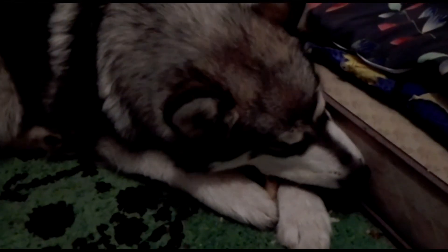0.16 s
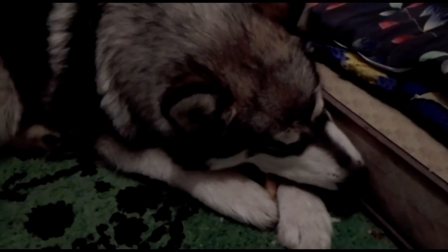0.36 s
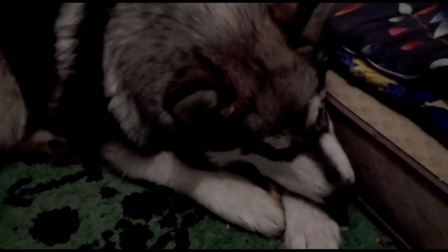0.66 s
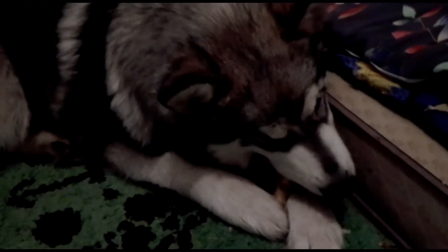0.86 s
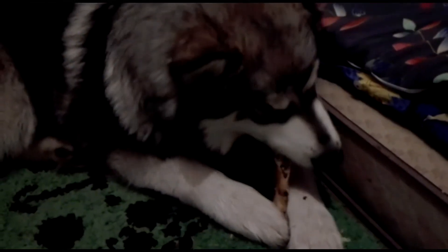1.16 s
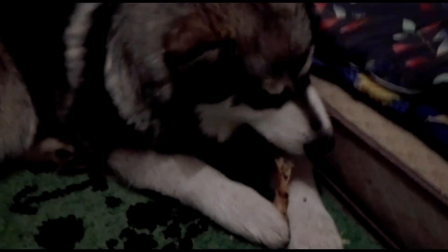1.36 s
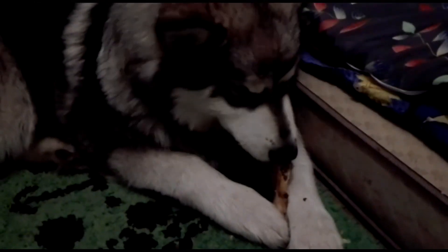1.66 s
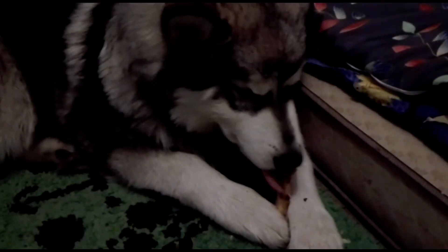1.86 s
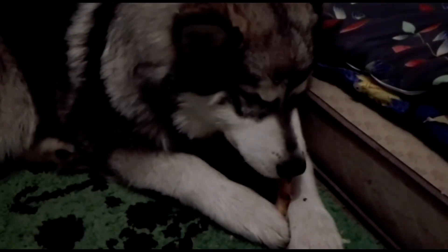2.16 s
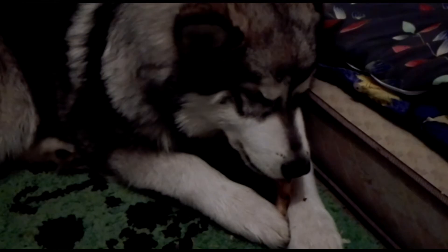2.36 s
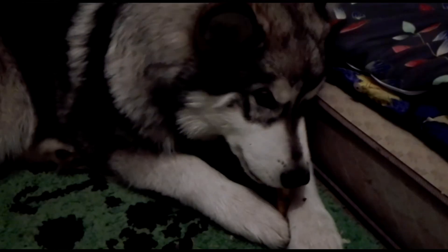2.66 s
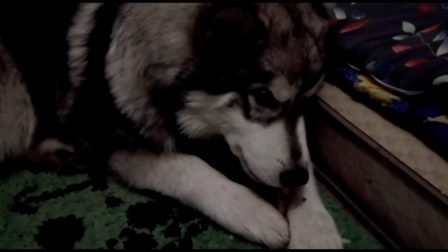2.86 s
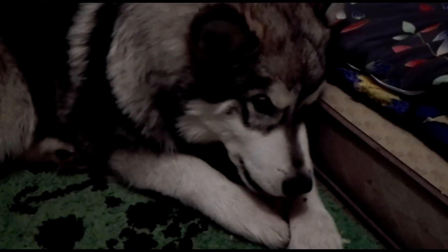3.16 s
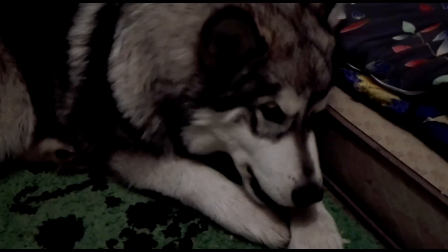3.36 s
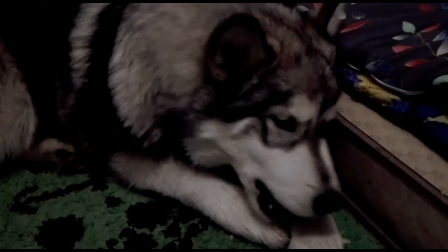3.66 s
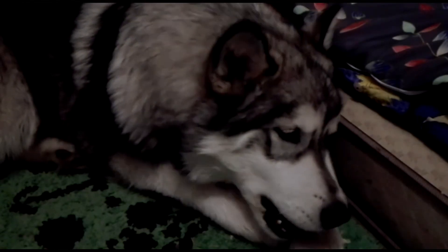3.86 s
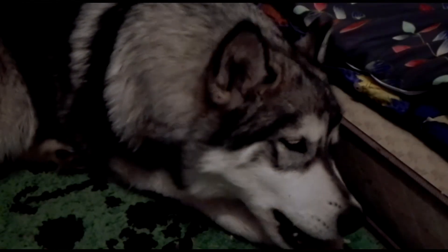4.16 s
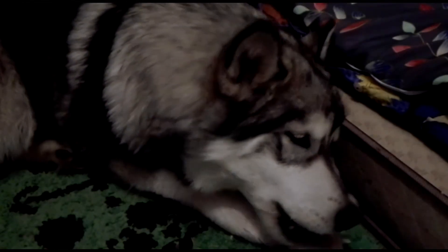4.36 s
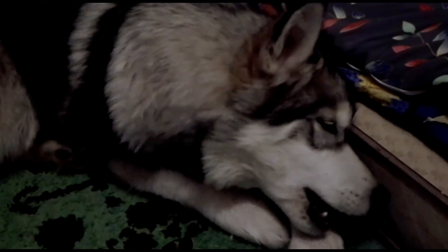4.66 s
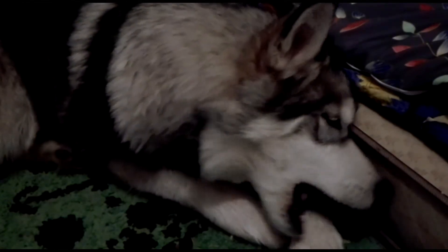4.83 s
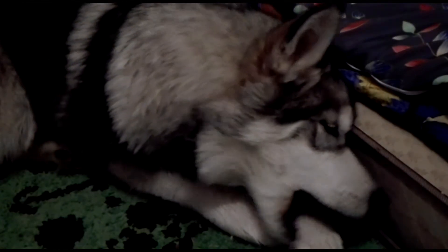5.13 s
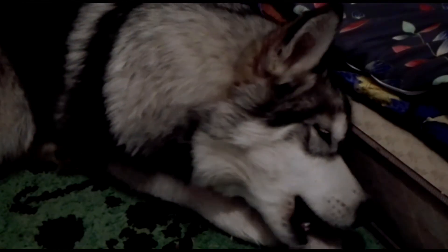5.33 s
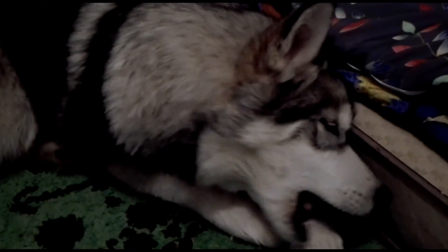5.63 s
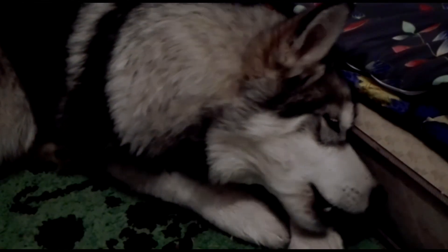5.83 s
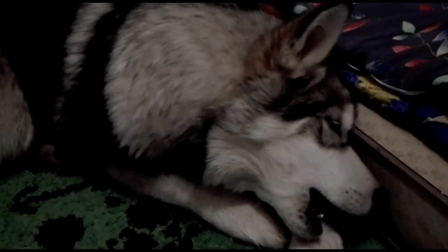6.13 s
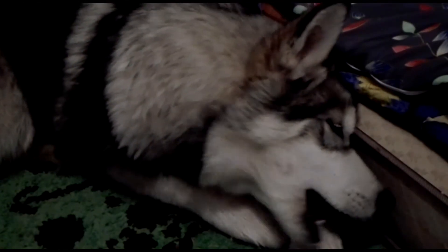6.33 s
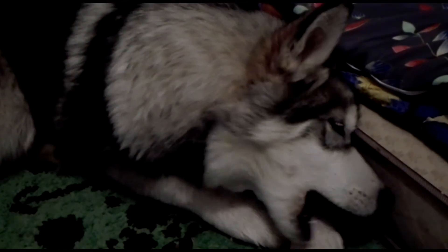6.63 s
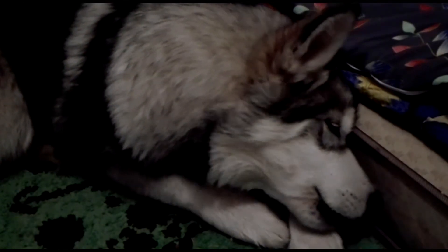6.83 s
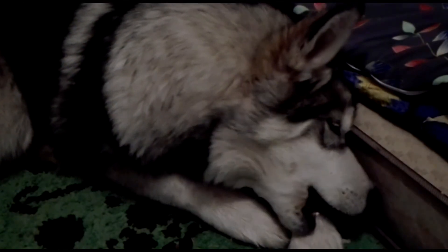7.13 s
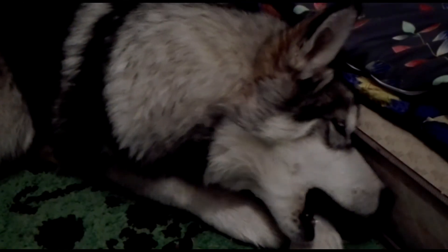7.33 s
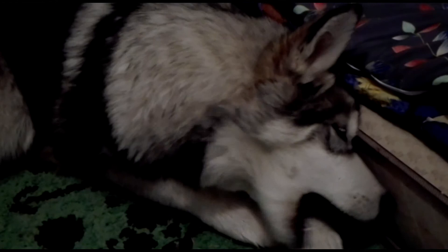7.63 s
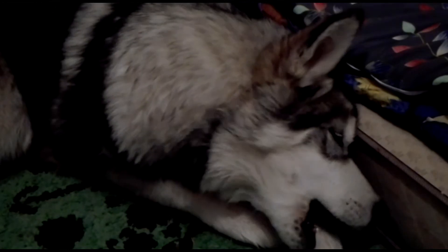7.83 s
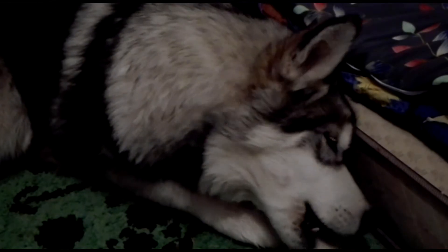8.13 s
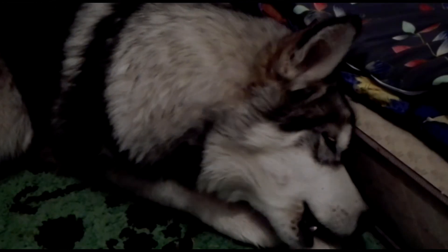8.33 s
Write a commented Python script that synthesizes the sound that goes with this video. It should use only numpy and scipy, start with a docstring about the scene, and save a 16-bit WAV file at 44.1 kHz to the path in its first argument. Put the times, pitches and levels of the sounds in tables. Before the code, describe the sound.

Small dry ticks and clicks of teeth on bone, a crisp crunch midway, and finally a violent cluster of cracks near the end.

```python
"""Dog gnawing a bone

Furnished room, quiet; a large dog on a rug, a metre from a small camera's microphone.
Cracks and faint ticks ring mouth, bone, teeth and jaw with a noisy splinter; thuds ring floor boards.
Random clicks, filtered, make shuffles, licks and a tooth's scrape; narrow noise makes a faint tone.
Floor echo and short room tail answer, over shaped-noise hiss, a wavering hum and a slow rumble."""
import sys
import numpy as np
from scipy import signal
from scipy.fft import rfft, irfft
from scipy.io import wavfile
from scipy.ndimage import uniform_filter1d

SR = 44100
rng = np.random.default_rng(int(sys.argv[2]) if len(sys.argv) > 2 else 0)


def int16_out(signal):
    """Quantize to a 16-bit WAV file."""
    q = np.round(np.clip(np.atleast_2d(signal).T, -1, 1) * 32767)
    wavfile.write(sys.argv[1], SR, q.astype(np.int16))


N = 374409

# microphone hiss, spectrum shape: f/Hz, relative level per Hz/dB
HISS_SHAPE = [(21, -23), (35, -9.5), (44, -14), (95, -21.5), (408, -33), (566, -36.5), (1090, -32.5),
              (1390, -32.5), (1500, -32.5), (1660, -34.5), (14000, -39)]
# rumble, level of its deep part: t/s, level/dB
RUMBLE_LEVEL = [(0.0, -59.5), (1.23, -65.5), (1.32, -51.5), (1.82, -85), (2.01, -61), (2.58, -71),
                (2.67, -48), (2.95, -74), (3.47, -55), (3.62, -77), (4.35, -56.5), (5.32, -72), (5.53, -45),
                (5.72, -75), (5.84, -49), (6.0, -66), (8.44, -59.5), (8.49, -79)]
# bites: t/s, f where the bite rings most/Hz, bone level/dB, tooth level/dB, mouth level/dB, splinter level/dB
BITES = [(0.077, 4770, -77, -60.5, -76, -56), (0.5048, 6340, -71, -64, -67.5, -64),
         (0.7562, 3900, -77, -55, -66, -56), (1.2582, 3460, -79, -73, -64, -74),
         (1.613, 1560, -61, -63, -62, -73), (1.993, 5170, -66, -57.5, -62, -53),
         (2.0666, 4750, -67, -58.5, -50, -52.5), (2.0922, 4650, -77, -63, -53, -59),
         (2.1168, 1640, -56, -51.5, -44.5, -65), (2.1206, 1590, -54, -56, -66, -61),
         (2.1272, 4830, -61, -50.5, -47, -60), (2.4827, 5520, -67.5, -46, -59.5, -62),
         (2.664, 4540, -69, -62, -82, -75), (3.239, 1560, -61, -56.5, -64, -64),
         (3.2969, 2140, -70, -73, -62.5, -72), (3.671, 4550, -78, -79, -71, -77),
         (3.7926, 5000, -62.5, -56.5, -81, -56), (3.826, 1430, -55, -53, -48.5, -75),
         (3.8641, 1420, -62, -63, -70, -66), (4.2321, 2380, -62.5, -61, -59, -72),
         (4.3181, 4970, -58, -60, -64.5, -46.5), (4.3484, 1730, -63, -67, -79, -68),
         (4.8874, 4660, -66, -59, -65.5, -51.5), (4.9676, 2090, -57, -59, -53, -64),
         (4.9713, 4400, -47, -43.5, -56, -70), (5.229, 2280, -49, -50, -60, -56),
         (5.3108, 2220, -39.5, -75, -38.5, -71), (5.3232, 5040, -52, -40, -51, -42),
         (5.3335, 1650, -42.5, -58, -40, -63), (5.342, 5700, -42, -37, -54, -44),
         (5.3682, 1740, -31.5, -42, -42, -52), (5.3699, 5650, -33, -30, -42, -33),
         (5.3743, 6220, -33, -32, -53, -49), (5.403, 4620, -45, -44, -52, -39),
         (5.4082, 3150, -47, -49, -46, -32), (5.433, 4700, -42, -37, -61, -47),
         (5.4373, 5220, -51, -49, -52, -49), (6.0422, 1640, -58, -50.5, -60, -72),
         (6.0454, 2060, -43, -51, -47.5, -59), (6.279, 1930, -50.5, -47, -58.5, -55),
         (6.3511, 2080, -35.5, -47.5, -55, -61), (6.3904, 3500, -67, -59, -64, -71),
         (6.541, 1950, -79, -74, -53.5, -73), (7.0617, 4740, -66, -63, -61, -62),
         (7.1394, 4600, -58, -51, -56, -80), (7.3232, 4900, -67, -51.5, -73, -58),
         (7.3662, 4630, -55.5, -54.5, -63.5, -75), (7.4148, 2210, -41.5, -40, -65, -73),
         (7.4167, 4800, -39.5, -47, -54, -68), (7.4284, 4520, -34, -34, -40, -73),
         (7.5997, 1890, -61.5, -71, -67, -72), (7.621, 1900, -63, -68, -67, -69),
         (7.6854, 2150, -53, -67, -63, -68), (7.6948, 2240, -45, -60, -45.5, -57),
         (7.7778, 5200, -60, -60, -65, -53), (7.7894, 5400, -58, -46, -46.5, -35),
         (7.7925, 5210, -38.5, -28.5, -67, -32), (7.7982, 2180, -39, -40, -49, -27.5),
         (7.8096, 2640, -25.5, -31, -35, -43), (7.8649, 5100, -45, -31, -36, -41),
         (7.8674, 2260, -28, -45, -31, -27), (7.905, 2930, -12.5, -8.5, -22.5, -19),
         (7.9158, 5300, -24, -14.5, -37, -16), (7.9393, 3400, -24, -6, -22, -21),
         (7.9698, 3160, -24, -7, -42, -27), (7.9716, 6250, -39, -5.5, -34, -16),
         (7.984, 4970, -22, -19, -42, -34), (7.9991, 3970, -5.5, -4, -45, -13),
         (8.0039, 3597, -12.5, 2.5, -17, -10), (8.2946, 2550, -51.5, -63.5, -58.5, -79.5),
         (8.3438, 4760, -54, -50.5, -51, -59.5), (8.3561, 2670, -41, -42.5, -53.5, -60),
         (8.4007, 4930, -65, -51, -79, -61.5)]
# hollow of the mouth, before a random detune: t/s, f/Hz
MOUTH_PITCH = [(0., 874), (1.3, 855), (2.1, 720), (2.5, 960), (3.3, 750), (3.85, 922), (5.3, 923),
               (6.05, 864), (7.3, 804), (7.8, 926), (8., 1100), (8.3, 860)]
# modes of the bone, before a random detune: f/Hz, level before scatter when the bite is far away in pitch/dB
BONE_MODES = [(1600, -25), (1900, -20.5), (2220, -19.5), (2620, -27), (3100, -30)]
# modes of the teeth, same columns: f/Hz, far level/dB
TEETH_MODES = [(3550, -32.5), (4600, -16.5), (5200, -21), (6000, -30)]
# skull and jaw under a bite: f/Hz, t60/s, level against the tooth/dB
JAW_MODES = [(128, 0.039, -43.5), (301, 0.011, -33.5)]
# splinter noise, band edges: f/Hz
SPLINTER_BAND = [6700, 13800]
# room tail, bands of noise: centre f/Hz, t60/s, relative level/dB
ROOM_BANDS = [(292, 0.33, -1.5), (900, 0.25, 1.5), (2300, 0.26, -3), (4340, 0.31, -6.5), (7330, 0.17, -1),
              (11500, 0.22, -3.5)]
# jaw and paw on the floor: t/s, peak level/dB, f/Hz
FLOOR_THUDS = [(0.666, -50, 124), (0.704, -53.5, 133), (1.251, -58, 118), (1.611, -53, 209),
               (1.654, -57, 250), (2.119, -55, 103), (5.227, -57.5, 235), (5.368, -38, 140),
               (7.423, -55.5, 142), (7.693, -56.5, 241), (7.801, -55.5, 358), (8.348, -56, 129)]
# shuffling on the rug: start t/s, loudest t/s, deep level/dB, scuff level/dB
RUG_SHUFFLES = [(1.23, 1.275, -65, -68.5), (1.36, 1.38, -74.5, -73), (1.51, 1.53, -85, -78),
                (1.595, 1.64, -80, -62.5), (2.036, 2.132, -65.5, -64.5), (2.7, 2.82, -73, -77),
                (4.17, 4.275, -71, -74), (5.365, 5.373, -50, -45), (6.29, 6.486, -68.5, -71.5),
                (7.374, 7.42, -69, -66), (8.32, 8.345, -60.5, -64.5)]
# tongue, one list for each lick: t/s, level/dB
LICK_LEVELS = [
    [(1.5, -84), (1.628, -76), (1.72, -82)],
    [(2.47, -85), (2.478, -71), (2.67, -75)],
]
# faint tone, perhaps from the throat: t/s, level/dB
TONE_LEVEL = [(2.74, -93), (2.78, -80), (2.88, -84), (2.91, -90)]
# tooth sliding along the bone: t/s, level/dB
SCRAPE_LEVEL = [(4.072, -75), (4.085, -59), (4.12, -57), (4.15, -65.5), (4.19, -75), (4.26, -76)]
# bone modes under the scrape: f/Hz, width/Hz, relative level per root width/dB
SCRAPED_MODES = [(963, 30, 1.5), (1950, 48, 1), (3500, 45, -1.5), (4870, 170, -4), (5800, 110, -13),
                 (6640, 26, -13)]

HISS_DB, HUM_DB, HUM_HZ = -72, -80, 48.4  # rms levels
RUMBLE_TOP_DB = -20.5  # faint upper part, against the deep part

# decay times for a light bite; a hard one shortens all but the splinter's
MOUTH_T60_S, BONE_T60_S, TOOTH_T60_S, SPLINTER_T60_S = 0.011, 0.005, 0.004, 0.0052
SNAP_PER_DB, SNAP_FROM_DB = 0.15, -43  # share of ring time lost for each dB above this level
REACH_OCTAVES = 0.13  # modes this near the bite ring most, the others faintly
SCATTER_DB, DETUNE = 3.5, 0.025  # random spread of far levels; of pitch, as a share
LOW_EDGE = 0.65  # cracks carry little below this share of the mouth hollow's pitch
TICKS_PER_S, TICK_DB, TICK_SPREAD_DB = 3.5, -69.5, 2.5  # least tooth level, mean rise above it

RUG_ECHO_S, RUG_ECHO_DB = 0.0032, -16
ROOM_DB, ROOM_RISE_S = -10.5, 0.0068
ROOM_END_S = 0.24  # the last of the tail drops away quickly
THUD_CYCLES = 7.1  # cycles in a thud's nominal 60 dB decay
BUMP_RISE_DB, DEEP_FALL_DB_S, SCUFF_FALL_DB_S = 12.5, 132, 208
TONE_HZ = 588
TOP_HZ = 14300  # recorder's upper limit


def undb(db):
    """Gain of a dB value."""
    return 10 ** (np.asarray(db) / 20)


def unit(x):
    """Scale to rms 1."""
    return x / np.sqrt(np.mean(x ** 2))


def band(x, lo_hz, hi_hz):
    """Band-pass between two edges."""
    return signal.sosfilt(signal.butter(2, [lo_hz, hi_hz], "band", fs=SR, output="sos"), x)


def envelope(tables):
    """Gain that follows each (t/s, level/dB) table while it lasts and is silent elsewhere."""
    t = np.arange(N) / SR
    gain = np.zeros(N)
    for table in tables:
        times, levels = np.array(table).T
        gain += undb(np.interp(t, times, levels, -200, -200))
    return uniform_filter1d(gain, size=300)  # softens the edges over 7 ms


def grains(rate, spread_db):
    """Random clicks at a mean rate per second, a few much larger than the rest."""
    size = undb(spread_db * rng.exponential(size=N)) * rng.standard_normal(N)
    return size * (rng.random(N) < rate / SR)


def background():
    """Stationary hiss and wavering narrow-band hum, with sub-bass noise that slowly swells and sinks."""
    hz = np.arange(N // 2 + 1) * SR / N + 1  # 1 Hz up, so that the logarithm exists
    shape_hz, shape_db = np.array(HISS_SHAPE).T
    colour = undb(np.interp(np.log(hz), np.log(shape_hz), shape_db))
    hiss = unit(irfft(rfft(rng.standard_normal(N)) * colour, N))
    hum = unit(band(rng.standard_normal(N), HUM_HZ - 3, HUM_HZ + 3))
    deep = unit(band(band(rng.standard_normal(N), 10, 22), 10, 22))
    upper = unit(band(rng.standard_normal(N), 35, 90))
    rumble = deep + undb(RUMBLE_TOP_DB) * upper
    return undb(HISS_DB) * hiss + undb(HUM_DB) * hum + envelope([RUMBLE_LEVEL]) * rumble


def ring(push, hz, t60, size=2048):
    """A damped mode that swells and dies, as two coupled resonances do, pushed by a short force; peak 1."""
    t = np.arange(size) / SR
    mode = t * np.sin(2 * np.pi * hz * t) * 1000. ** (-t / t60)
    y = np.convolve(push, mode)[:size]
    # a small body radiates little far from its ring
    y = band(y, hz / 2.4, min(hz * 2.4, .45 * SR))
    return y / np.abs(y).max()


def body(modes, push, bite_hz, t60, luck):
    """All modes of one body under a push, strongest near the bite's pitch; peak 1."""
    y = 0
    for (hz, far_db), shift, spread in zip(modes, luck[0::2], luck[1::2]):
        near = np.exp(-(np.log2(hz / bite_hz) / REACH_OCTAVES) ** 2)
        far = undb(far_db + SCATTER_DB * spread)
        y = y + (near + far) * ring(push, hz * (1 + DETUNE * shift), t60)
    return y / np.abs(y).max()


def tooth_ticks():
    """Faint bites at random moments, in the columns of BITES, their levels tied to the tooth's."""
    ticks = []
    for moment, strength, pitch in rng.random((int(TICKS_PER_S * N / SR), 3)):
        s = moment * N / SR
        tooth_db = TICK_DB - TICK_SPREAD_DB * np.log(1 - strength)
        bite_hz = 1500 + 4500 * pitch
        ticks.append((s, bite_hz, tooth_db - 5, tooth_db, tooth_db - 9, tooth_db - 3.5))
    return ticks


def crack(bite):
    """A sharp slip and a moment of crumbling ring mouth, bone, teeth and jaw; splinters add a noise burst."""
    s, bite_hz, bone_db, tooth_db, mouth_db, splinter_db = bite
    t = np.arange(2048) / SR
    noise = rng.standard_normal(2048)
    luck = rng.standard_normal(2 * len(BONE_MODES + TEETH_MODES) + 1)
    push = (0.19 * noise * np.exp(-t / 0.0018))[:256]  # crumbling
    push[0] = 1  # slip
    # a harder bite clamps the bone, so it rings shorter and broader
    free = np.clip(1 - SNAP_PER_DB * (max(bone_db, tooth_db) - SNAP_FROM_DB), .17, 1)
    mouth_hz = np.interp(s, *np.array(MOUTH_PITCH).T) * (1 + DETUNE * luck[-1])
    y = undb(mouth_db) * ring(push[:8], mouth_hz, np.sqrt(free) * MOUTH_T60_S)
    y += undb(bone_db) * body(BONE_MODES, push, bite_hz, free * BONE_T60_S, luck)
    tooth_luck = luck[2 * len(BONE_MODES):]
    y += undb(tooth_db) * body(TEETH_MODES, push, bite_hz, free * TOOTH_T60_S, tooth_luck)
    y = band(y, LOW_EDGE * mouth_hz, 18000)
    for hz, t60, jaw_db in JAW_MODES:
        y += undb(tooth_db + jaw_db) * ring(push[:1], hz, t60)
    return y + undb(splinter_db) * band(noise * 1000. ** (-t / SPLINTER_T60_S), *SPLINTER_BAND)


def cracks():
    """Every bite and faint tick, each a separate short fracture, laid at its moment."""
    out = np.zeros(N + 2048)
    for bite in list(BITES) + tooth_ticks():
        start = int(bite[0] * SR)
        out[start:start + 2048] += crack(bite)
    return out[:N]


def floor_echo(dog):
    """One weaker, delayed copy, as the floor under the rug reflects it."""
    return undb(RUG_ECHO_DB) * np.roll(dog, int(RUG_ECHO_S * SR))


def walls():
    """Dense echoes of a small room: they build up within milliseconds and each band dies at its own pace."""
    t = np.arange(SR // 2) / SR
    echoes = np.zeros(SR // 2)
    for hz, t60, db in ROOM_BANDS:
        noise = band(rng.standard_normal(SR // 2), hz / 1.8, hz * 1.76)
        echoes += undb(db) * noise * 1000. ** (-t / t60)
    rise = 1 - np.exp(-(t / ROOM_RISE_S) ** 2)
    end = np.exp(-(t / ROOM_END_S) ** 4)
    echoes = echoes * rise * end
    return undb(ROOM_DB) * echoes / np.sqrt(np.sum(echoes ** 2))


def thuds():
    """Jaw or paw strikes the floor: each thud rings a board for a few cycles."""
    out = np.zeros(N + 8192)
    for s, db, hz in FLOOR_THUDS:
        start = int(s * SR)
        out[start:start + 8192] += undb(db) * ring(np.ones(1), hz, THUD_CYCLES / hz, size=8192)
    return out[:N]


def bump_swell(column, fall_db_s):
    """Gain of the shuffles: each movement swells to its loudest moment and fades at a steady dB rate."""
    tables = []
    for bump in RUG_SHUFFLES:
        start, loudest, db = bump[0], bump[1], bump[column]
        tables.append([(start, db - BUMP_RISE_DB), (loudest, db), (loudest + 1, db - fall_db_s)])
    return envelope(tables)


def bumps():
    """Paws and jaw shift on the rug: random pushes give a deep shake of the boards and a thick scuff."""
    deep = unit(band(grains(260, 3.4), 70, 158))
    pushes = grains(900, 2.1)
    scuff = unit(band(pushes, 190, 405))
    scuff += 0.55 * unit(band(pushes, 400, 684))
    scuff += 0.43 * unit(band(pushes, 880, 1730))
    return bump_swell(2, DEEP_FALL_DB_S) * deep + bump_swell(3, SCUFF_FALL_DB_S) * scuff


def licks():
    """The wet tongue drags with a fine fizz of dense, band-limited clicks."""
    return envelope(LICK_LEVELS) * unit(band(grains(5500, 2.9), 3660, 6700))


def faint_tone():
    """A short, slightly unsteady tone: noise in a narrow band."""
    return envelope([TONE_LEVEL]) * unit(band(rng.standard_normal(N), TONE_HZ - 35, TONE_HZ + 35))


def scrape():
    """A tooth slides along the bone in dense slips that ring its modes."""
    slips = grains(2300, 1.3)
    rung = np.zeros(N)
    for hz, width, db in SCRAPED_MODES:
        mode = unit(band(slips, hz - 3.0 * width, hz + 2.5 * width))
        rung += undb(db) * mode * np.sqrt(width)
    rasp = unit(band(slips, 1340, 7000))
    return envelope([SCRAPE_LEVEL]) * unit(unit(rung) + 0.88 * rasp)


def scene():
    """The dog, its echo off the floor, the room's answer, shuffling and the background."""
    dog = cracks() + thuds() + licks() + faint_tone() + scrape()
    room = signal.fftconvolve(dog, walls())[:N]
    return (dog + floor_echo(dog) + room + bumps() + background())[None]


def record(dry):
    """Peaks beyond full scale clip, then a steep low-pass cuts the top."""
    low_pass = signal.ellip(8, .2, 40, TOP_HZ, fs=SR, output="sos")
    return signal.sosfilt(low_pass, np.clip(dry, -1, 1))


dry = scene()
out = record(dry)
int16_out(out)
```